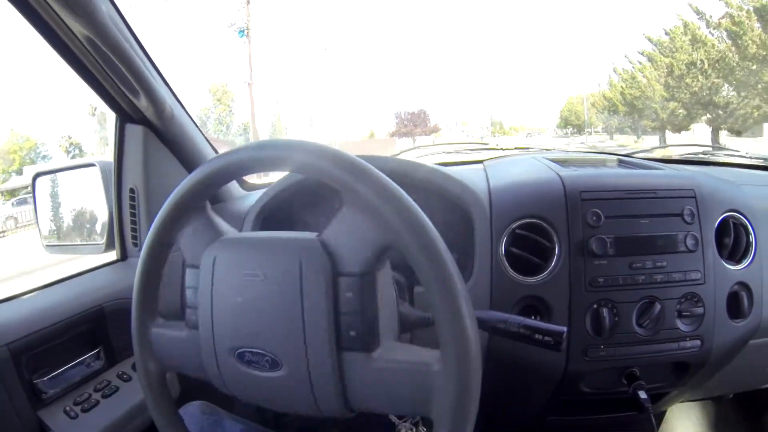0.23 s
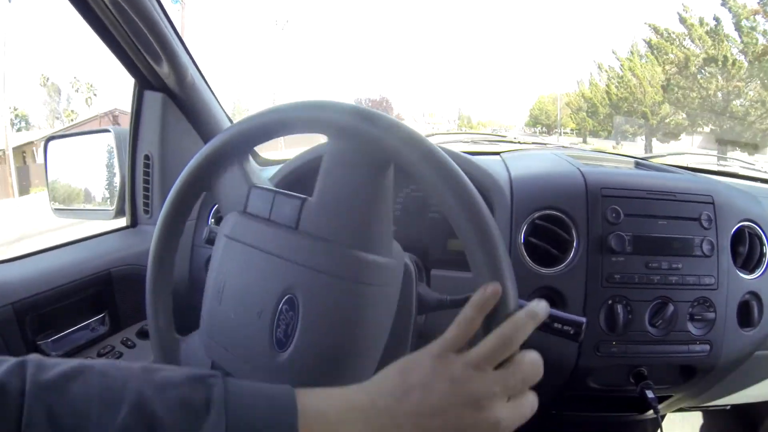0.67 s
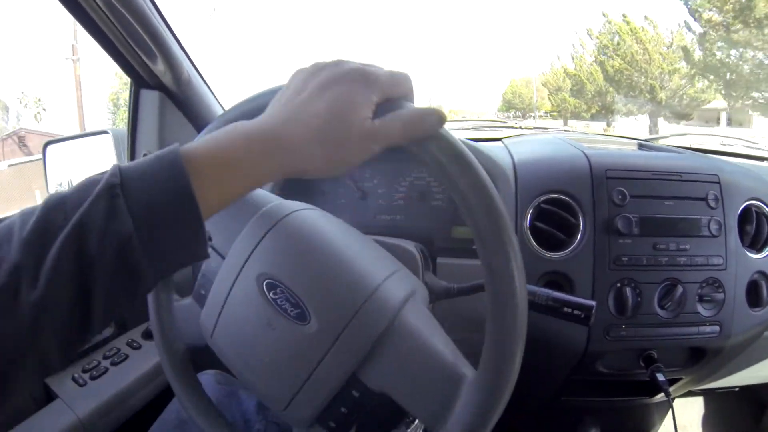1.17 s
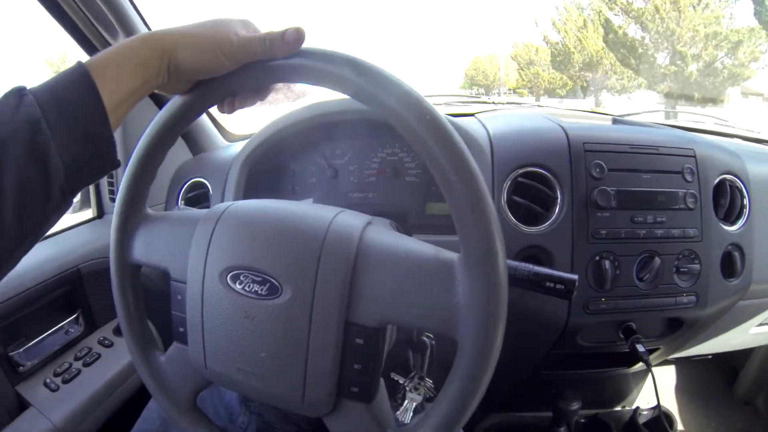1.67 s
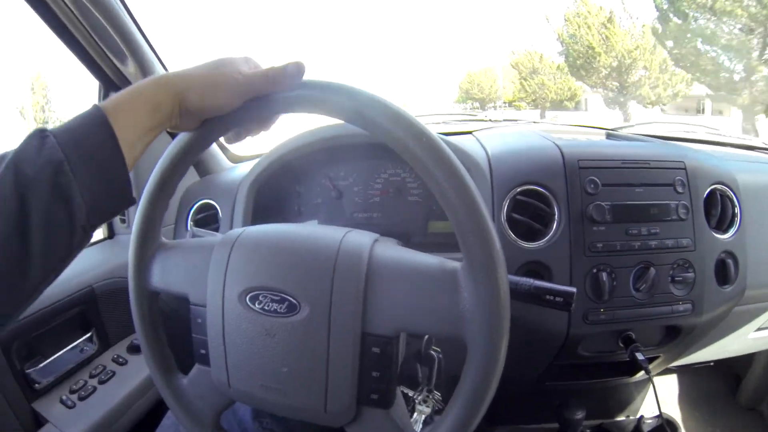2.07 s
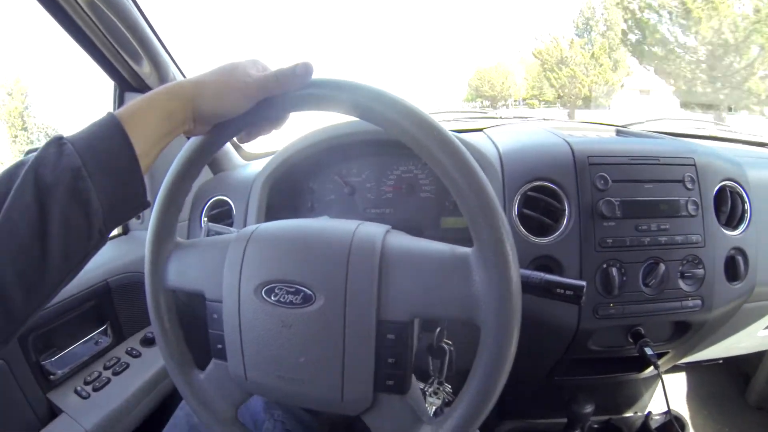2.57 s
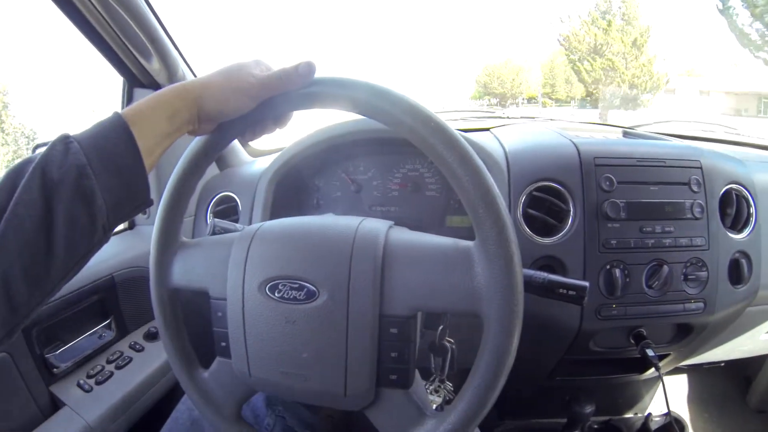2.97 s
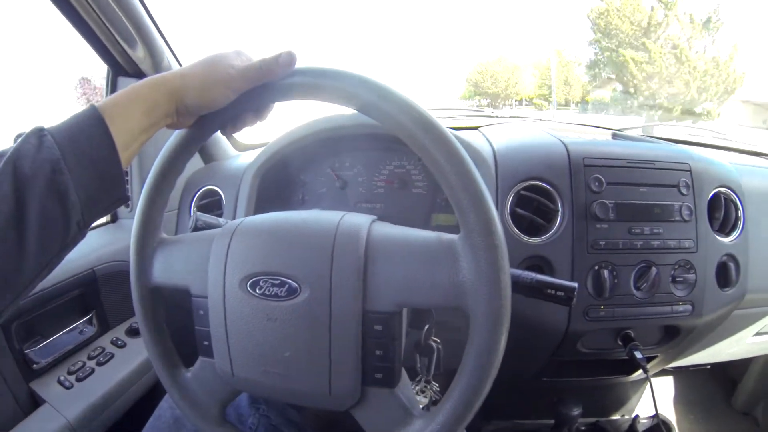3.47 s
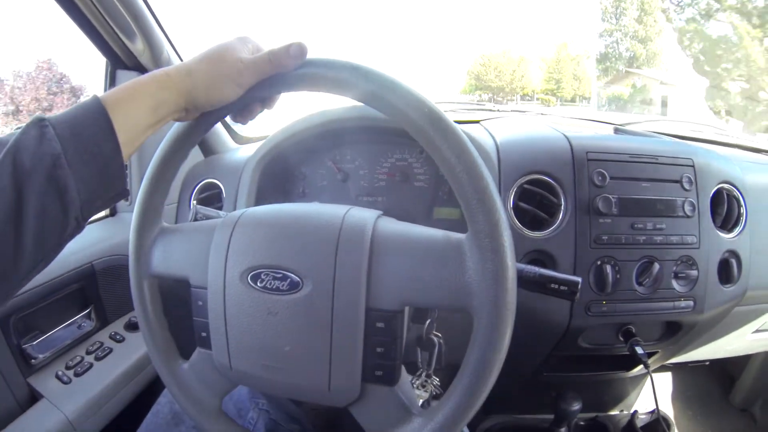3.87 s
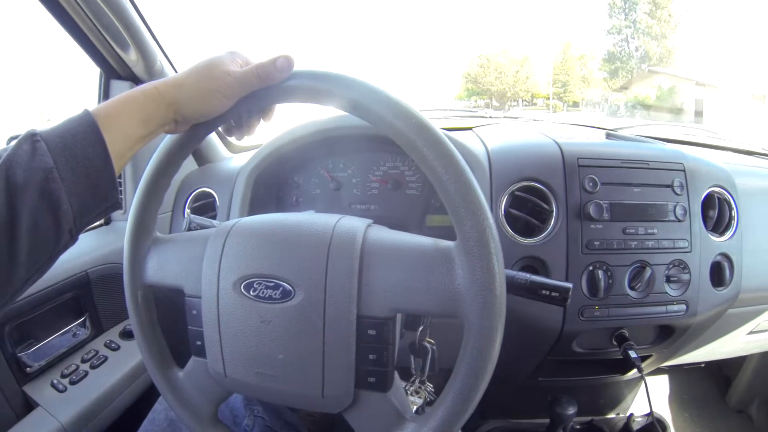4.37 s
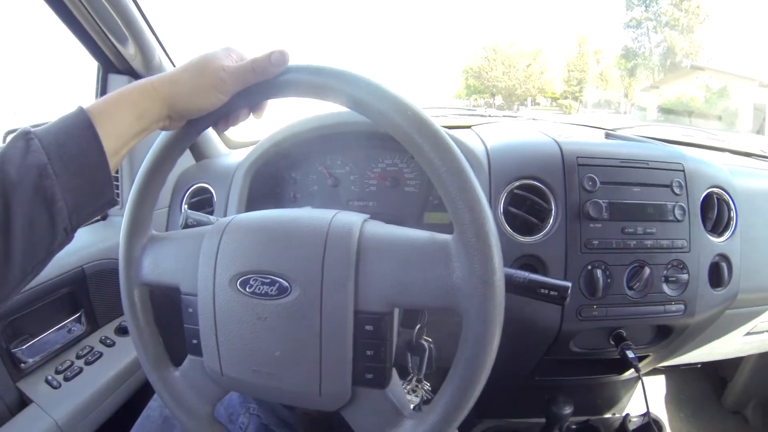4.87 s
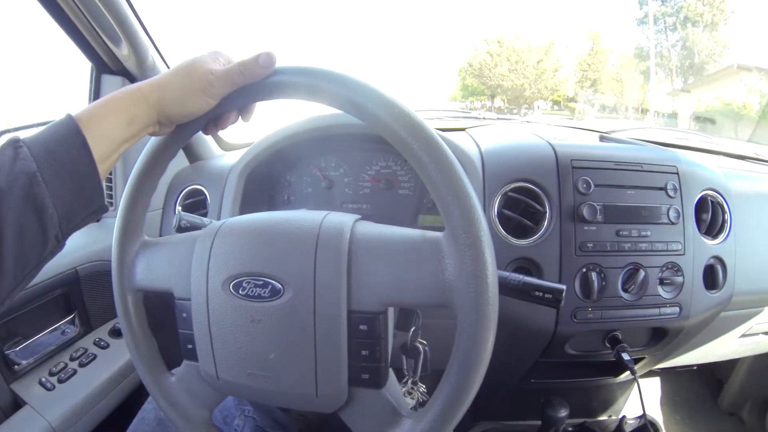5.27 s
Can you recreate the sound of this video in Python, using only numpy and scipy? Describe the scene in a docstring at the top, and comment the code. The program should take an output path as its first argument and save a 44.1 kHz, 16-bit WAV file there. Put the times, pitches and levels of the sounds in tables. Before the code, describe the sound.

Deep tyre rumble and engine hum fill a moving pickup's cab, as a hand slides on the wheel and keys clink faintly.

```python
"""An eight-cylinder engine drones, heard inside a pickup cab: it revs, shifts up and pulls again.
A worn bearing hums with road speed, the cab shakes on its mounts, its panels boom and the tyres roar.
A hand slides and slaps on the steering wheel, keys clink, thin whines come and go and loose trim ticks.
Engine, bearing, keys and whines are made of sine waves; the rest is shaped noise."""
import sys
import numpy as np
from scipy import signal
from scipy.fft import rfft, irfft, next_fast_len
from scipy.io import wavfile
from scipy.ndimage import uniform_filter1d, map_coordinates

SR = 44100
rng = np.random.default_rng(int(sys.argv[2]) if len(sys.argv) > 2 else 0)


def generate_wav(sig):
    """Save sig (samples, or channels by samples) to the path in sys.argv[1] as 16-bit PCM at SR."""
    pcm = np.round(np.clip(np.atleast_2d(sig).T, -1, 1) * 32767).astype(np.int16)
    wavfile.write(sys.argv[1], SR, pcm)


N = 243882

# The engine's main note (time [s], firing rate [Hz], level [dB])
FIRING = [(0, 138.6, -43), (.26, 146.1, -40.5), (.4, 149.6, -28), (.68, 153.5, -30.5), (.85, 155, -37),
          (1, 157.1, -42), (1.1, 158.8, -31.5), (1.25, 163.9, -42.5), (1.5, 169.5, -33.5),
          (1.7, 169.9, -30), (1.9, 170.7, -34.5), (2.3, 142.3, -43), (2.47, 148.7, -38),
          (2.57, 151.4, -31.5), (3.1, 154.5, -30), (3.45, 153.4, -35.5), (3.8, 153.9, -32),
          (4.05, 156.2, -45.5), (4.45, 160.8, -35), (4.9, 162.3, -42.5), (5.2, 164.3, -33),
          (5.53, 165, -39.5)]
# Its other tones (time [s], octave level [dB], uneven firing level [dB])
OVERTONE_LEVELS = [(0, -52, -77), (.45, -40, -42.5), (.8, -50, -55), (1.05, -45, -51), (1.3, -54, -53),
                   (1.55, -44.5, -50), (1.9, -46, -63), (2.4, -57, -42), (2.65, -37.5, -47.5),
                   (3.1, -38.5, -44.5), (3.5, -38.5, -49), (4.05, -48, -44.5), (4.35, -40, -46),
                   (4.9, -44.5, -50.5), (5.53, -52, -48)]
# Tones of uneven firing (multiple of the cycle rate, relative level [dB])
UNEVEN_TONES = [(3, 7.5), (6, -3.5), (9, 3.5), (11, 0.5), (12, -3.5), (14, -2)]
# Tones that stand out in the higher gear (multiple of the cycle rate, relative level [dB])
HIGH_GEAR_TONES = [(18, -14), (21, -1.5), (26, -6), (27, -8.5), (30, -10.5)]
def engine(shift_s=2.37):
    """Eight cylinders fire, a little unevenly, in each cycle. Returns the sound and the cycle count."""
    firing_hz, firing_db = curves(FIRING)
    octave_db, uneven_db = curves(OVERTONE_LEVELS)
    cycles = np.cumsum(firing_hz) / SR / 8
    high_gear = np.clip((np.arange(N) / SR - shift_s) / 0.35, .4, 1)
    uneven = sum(amp(db) * tone(k * cycles, waver=0.33, flutter_db=2.5) for k, db in UNEVEN_TONES)
    upper = sum(amp(db) * tone(k * cycles, waver=0.23, flutter_db=2.0) for k, db in HIGH_GEAR_TONES)
    note = amp(firing_db) * tone(8 * cycles, waver=0.02, flutter_db=1.7)
    octave = amp(octave_db) * tone(16 * cycles, waver=0.073, flutter_db=-0.54)
    return note + octave + amp(uneven_db) * (uneven + high_gear * upper), cycles


# The bearing's hum (time [s], beat rate [Hz], level [dB], level at three times that rate [dB])
BEARING_HUM = [(0, 23.7, -60, -39), (.6, 24.3, -35, -38), (1, 24.5, -26, -37), (1.5, 26.85, -52, -34.5),
               (2, 25.5, -44, -47.5), (2.45, 32.41, -30, -34.5), (2.8, 31.06, -38, -32.5),
               (3.28, 36.56, -23.5, -42.5), (3.55, 37.34, -31, -47), (3.9, 38.33, -26, -41),
               (4.2, 39.13, -18.5, -30.5), (4.5, 42.07, -35.5, -36.5), (4.8, 41.88, -33, -41.5),
               (5.1, 40.75, -27.5, -40), (5.53, 39.65, -34, -34)]
def bearing():
    """A worn bearing hums at 1, 3 and 6 times its beat, rising with road speed whatever the gear."""
    beat_hz, beat_db, third_db = curves(BEARING_HUM)
    turns = np.cumsum(beat_hz) / SR
    sixth_db = third_db - 21 + 0.84 * (beat_hz - beat_hz[0])  # gains with speed
    return (amp(beat_db) * tone(turns, waver=0.22, flutter_db=3.1)
            + amp(third_db) * tone(3 * turns, waver=0.18, flutter_db=1.3)
            + amp(sixth_db) * tone(6 * turns, waver=0.88, flutter_db=2.5))


# How the cab's mounts resonate (frequency [Hz], relative level [dB])
MOUNT_COLOUR = [(7, -19), (13.5, -9), (19, 1), (25, -7), (32, -22.5)]
# Bumps in the road (time [s], level [dB])
BUMPS = [(.08, -15.5), (1.52, -20), (1.95, -18), (2.22, -21), (2.55, -22), (3.03, -19.5), (3.55, -23),
         (3.76, -17.5), (3.98, -16), (4.36, -19), (4.92, -17), (5.3, -21.5), (5.5, -20)]
def cab_shake(steady_db=-24.5, rise_s=0.15, fall_s=0.086):
    """The cab bounces on its mounts all the time, and harder at each bump."""
    margin = SR // 4
    padded = np.pad(rush(MOUNT_COLOUR, patchy_db=-2.5), margin, "reflect")
    swing = signal.hilbert(padded, next_fast_len(N + SR))[margin:][:N]
    # Keep the low shake at an even strength, so each bump stands out
    bounce = unit(swing.real / (np.abs(swing) + .2))
    jolts = swells([(s, rise_s, fall_s, db) for s, db in BUMPS])
    return np.hypot(amp(steady_db), jolts) * bounce


# The panels' deep sound (frequency [Hz], relative level [dB])
PANEL_COLOUR = [(14, -25), (24, -3), (47, 3.5), (57, -11), (70, -21.5), (80, -29.5), (100, -52)]
# How loudly they boom (time [s], level [dB])
PANEL_LEVEL = [(0, -21.5), (.4, -30), (.9, -34.5), (1.5, -28), (1.9, -24.5), (2.4, -26), (2.8, -28),
               (3.3, -27.5), (3.8, -30.5), (5.2, -27), (5.53, -35)]
def panel_boom():
    """The cab's panels vibrate with a low, wavering boom."""
    return amp(curves(PANEL_LEVEL)[0] + 3.32 * wobble(6.015)) * rush(PANEL_COLOUR, patchy_db=-1.0)


# The tyres' low roar and high hiss (frequency [Hz], relative level [dB])
ROAR_COLOUR = [(55, -17.5), (75, 3.5), (112, 5.5), (136, 2.5), (165, 4.5), (195, -10.5), (235, -4),
               (300, -4.5), (400, -8), (550, -17), (650, -19), (1250, -26), (1700, -34), (2500, -47.5)]
HISS_COLOUR = [(1000, -1), (1700, -2.5), (2100, 0), (3050, -8), (3430, -8.5), (4000, -13), (6000, -20),
               (9000, -27), (12600, -29.5), (14200, -44.5), (15000, -57.5)]
# How loudly they roar (time [s], level [dB])
TYRE_LEVEL = [(0, -33), (1.5, -31), (2.3, -32), (2.9, -31.5), (3.9, -30.5), (4.45, -28.5), (5.53, -29.5)]
def tyres(cycles, thud_hz=130, hiss_db=-55.5):
    """Rolling tyres roar and hiss, throbbing with the engine; the lowest part thuds unevenly."""
    throb_db = .45 * np.sin(2 * np.pi * cycles) + .45 * np.sin(4 * np.pi * cycles)
    roar = amp(curves(TYRE_LEVEL)[0] + 0.27 * wobble(8) + throb_db) * rush(ROAR_COLOUR, patchy_db=0.62)
    lows = filtered(roar, lambda hz: 1 / (1 + (hz / thud_hz) ** 4))
    thuds = (amp(2.5 * wobble(5.08)) - 1) * lows
    hiss = amp(hiss_db + 0.11 * wobble(12) + 0.6 * throb_db) * rush(HISS_COLOUR, patchy_db=0.56)
    return roar + thuds + hiss


# Bright swishes and ticks; duller rasps and knocks (frequency [Hz], relative level [dB])
BRIGHT_COLOUR = [(3000, -20), (5000, -2), (10300, -2.5), (13000, -6), (15000, -12.5)]
DULL_COLOUR = [(500, -16), (1000, 0), (2300, -1.5), (4300, -11), (5500, -13), (14500, -32.5)]
# The wheel slides; the grip tightens (peak time [s], rise [s], fall [s], level [dB])
PALM_SLIDES = [(.07, 0.099, 0.33, -66.5), (.46, 0.11, 0.1, -59.5), (.78, 0.35, .3, -70),
               (1.25, 0.23, 0.24, -69), (1.53, 0.04, .15, -67)]
TIGHT_GRIPS = [(.65, 0.12, 0.13, -57), (1.15, 0.21, 0.23, -56), (1.36, 0.21, 0.14, -53.5),
               (1.53, 0.055, 0.18, -49.5), (1.8, .1, 0.2, -59)]
def hand_rub(slips_per_s=82, slip_t60_s=.03):
    """The wheel swishes through a loose palm; in a tight grip, skin sticks and lets go with a rasp."""
    swish = unit(amp(1.2 * wobble(40)) * rush(BRIGHT_COLOUR, patchy_db=.5))
    slips = np.cumsum(slips_per_s * amp(2.5 * wobble(45))) / SR
    size_db = 1.8 * rng.standard_normal(1000)[slips.astype(int)]
    since_slip_s = (slips % 1) / slips_per_s
    catches = amp(size_db) * decay(since_slip_s, slip_t60_s) + amp(-10)  # plus a steady rub
    rasp = unit(wheel_rim(catches * rush(DULL_COLOUR, patchy_db=2.0)))
    return swells(PALM_SLIDES) * swish + swells(TIGHT_GRIPS) * rasp


# Slaps and ticks on the wheel (time [s], level [dB], knock boost [dB])
WHEEL_TAPS = [(0.0414, -41, -10), (0.4645, -48.5, 9.5), (0.588, -56, 2), (0.618, -58, 9), (0.653, -59.5, 6),
              (0.7944, -56.5, 7.5), (1.0822, -62, 14), (1.284, -57, 8), (1.503, -60, 13), (1.534, -61, 16),
              (1.584, -52, 17), (1.5909, -60, 19), (1.6168, -61, 17), (1.6373, -60, 18),
              (1.6641, -57.5, 12), (1.6995, -53, 11.5), (1.7414, -51.5, 11), (2.0453, -60, 2),
              (3.3911, -60.5, -3), (3.976, -61, 10), (4.2561, -63, 8), (4.5904, -61, 6)]
def hand_taps(landing_s=0.00095):
    """Each tap is a short burst of noise, bright on top with a duller knock below."""
    bright, knock = np.zeros((2, N + SR))
    t = np.arange(SR // 8) / SR
    rise = 1 - np.exp(-t / landing_s)  # a soft palm lands over a few ms
    crack = amp(2) * decay(t, 0.012)  # the first contact
    for s, db, boost_db in WHEEL_TAPS:
        start = round(s * SR)
        bright[start:][:len(t)] += amp(db) * decay(t, 0.044) * rise
        knock[start:][:len(t)] += amp(db + boost_db) * (decay(t, 0.065) + crack) * rise
    ticks = bright[:N] * rush(BRIGHT_COLOUR, patchy_db=1.5)
    return ticks + wheel_rim(knock[:N] * rush(DULL_COLOUR, patchy_db=1.5)) / 2


# Where the wheel's rim rings (pitch [Hz], width [Hz], strength [dB])
RIM_RINGS = [(1925, 110, 2.5), (2395, 230, 2), (3430, 150, 4.5), (3830, 220, 2.5), (4300, 180, 3.5)]
def wheel_rim(x):
    """The plastic wheel rings along with x, lifting a few pitches."""
    return filtered(x, lambda hz: 1 + sum(
        amp(db) * 1j * hz * width / (pitch ** 2 - hz ** 2 + 1j * hz * width)
        for pitch, width, db in RIM_RINGS))


# Keys hit each other (time [s], level [dB])
KEY_HITS = [(.793, -58), (.808, -62), (.822, -61), (1.285, -57), (1.587, -51)]
# A key's tones (pitch [Hz], relative level [dB], time to fall 60 dB [s])
KEY_TONES = [(5500, -2, 0.06), (6030, 4, 0.055), (6250, 0, 0.045), (4100, -2, 0.025)]
# The key ring's small parts touch (time [s], level [dB], centre pitch [Hz])
SMALL_CLINKS = [(2.0458, -64, 13100), (3.5395, -64, 14000), (3.691, -55, 13360), (3.9754, -60, 11900),
                (4.2556, -64, 13540), (4.5535, -62, 7170), (4.59, -62, 6990)]
def keys(pitch_spread=.06, landing_s=0.00095):
    """Swinging keys and small metal parts collide and ring briefly, with slightly rough tones."""
    out, t = np.zeros(N + SR), np.arange(SR // 8) / SR
    for s, db in KEY_HITS:
        for hz, tone_db, t60_s in KEY_TONES:
            gain = amp(db + tone_db + rng.normal(0, 3.1)) * decay(t, t60_s)
            drift = np.cumsum(rng.normal(0, 0.082, len(t)))
            out[round(s * SR):][:len(t)] += gain * np.sin(2 * np.pi * hz * t + drift)
    rise = 1 - np.exp(-t / landing_s)
    for s, db, hz in SMALL_CLINKS:
        tones_hz = hz * (1 + pitch_spread * rng.uniform(-1.3, 1, size=(6, 1)))
        drift = np.cumsum(rng.normal(0, .15, (6, len(t))), axis=1)
        ring = 2 * np.sin(2 * np.pi * tones_hz * t + drift).mean(axis=0)
        out[round(s * SR):][:len(t)] += amp(db) * decay(t, 0.054) * rise * ring
    return out[:N]


# Brief thin whines (start [s], end [s], first pitch [Hz], last pitch [Hz], level [dB])
WHINE_GLIDES = [(0.763, 1.104, 233.7, 239, -39), (0.859, 1.18, 1045, 1112, -56.5),
                (0.895, 1.1, 790, 815, -54), (0.648, 1.457, 459.3, 503, -51.5),
                (1.21, 1.899, 297, 313, -43), (1.52, 1.85, 1020, 1030, -57),
                (2.308, 3.105, 3380, 3400, -73), (3.8, 4.17, 3312, 3430, -72),
                (4.55, 5.25, 1127, 1151, -62), (4.65, 5.298, 2920, 3020, -71),
                (4.048, 4.8, 1940, 1956, -67)]
def whines():
    """Each whine glides up, swelling and fading once; higher ones flutter more and sound scratchier."""
    t, out = np.arange(N) / SR, 0
    for start, end, first_hz, last_hz, db in WHINE_GLIDES:
        progress = np.clip((t - start) / (end - start), 0, 1)
        khz = first_hz / 1000
        scratch = .11 * khz * wobble(80)
        turns = np.cumsum(first_hz + (last_hz - first_hz) * progress) / SR + scratch
        flutter = amp(1.3 * khz * wobble(30))
        swell = np.sqrt(np.abs(np.sin(np.pi * progress)))
        out += amp(db) * swell * flutter * tone(turns, waver=1.2, flutter_db=1.2)
    return out


def trim(ticks_per_s=7):
    """Loose trim gives faint, bright ticks at random moments."""
    when, softness = rng.random((round(ticks_per_s * N / SR), 2)).T
    blows = np.bincount((when * N).astype(int), amp(-78) / np.sqrt(softness + .15), N)
    dying = decay(np.arange(SR // 20) / SR, .03)
    return signal.fftconvolve(blows, dying)[:N] * rush(BRIGHT_COLOUR, patchy_db=3)


def amp(db):
    """Turn a level in dB into a gain."""
    return 10 ** (np.asarray(db) / 20)


def decay(t, t60_s):
    """A gain that falls 60 dB every t60_s seconds."""
    return amp(-60 * t / t60_s)


def unit(x):
    """Scale x to an average power of 1."""
    return x / np.sqrt(np.mean(x ** 2) + 1e-20)


def curves(rows):
    """One value per sample for each column after the time."""
    times, *columns = np.transpose(rows)
    return [np.interp(np.arange(N) / SR, times, column) for column in columns]


def swells(rows):
    """A gain that rises and falls around each row's peak time; overlapping powers add."""
    t = np.arange(0, N, 64) / SR
    power = sum(amp(db) ** 2 * np.exp(-2 * np.where(t < s, (s - t) / rise, (t - s) / fall) ** 2)
                for s, rise, fall, db in rows)
    return np.interp(np.arange(N) / SR, t, np.sqrt(power))


def wobble(rate):
    """A smooth curve through `rate` random points a second."""
    steps = np.arange(0, N + 64, 64)
    points = rng.standard_normal(int(N * rate / SR) + 4)
    return np.interp(np.arange(N), steps, map_coordinates(points, [steps * rate / SR + 1]))


def filtered(x, response):
    """Scale each frequency in x by response(hz)."""
    size = next_fast_len(N + 8192)
    return irfft(rfft(x, size) * response(np.fft.rfftfreq(size, 1 / SR)), size)[..., :N]


def rush(colour, patchy_db):
    """Noise of power 1, shaped by a colour table, with random louder and softer patches."""
    grid = signal.stft(rng.standard_normal(N), nperseg=512)[2]
    patches = uniform_filter1d(rng.standard_normal(grid.shape), size=6, axis=0, mode="wrap")
    patches = uniform_filter1d(patches, size=10, axis=1, mode="wrap")
    noise = signal.istft(grid * amp(patchy_db * unit(patches)), nperseg=512)[1][:N]
    points_hz, db = np.transpose(colour)
    return unit(filtered(noise, lambda hz: amp(np.interp(np.log(hz + 1), np.log(points_hz), db, -120, -120))))


def tone(turns, waver, flutter_db):
    """A sine wave on a running count of turns, unsteady in phase (waver, radians) and level."""
    phase = 2 * np.pi * (turns + rng.random()) + waver * wobble(7)
    return np.sqrt(2) * np.sin(phase) * amp(flutter_db * wobble(6))


def scene():
    """Add all the sounds into one channel."""
    motor, cycles = engine()
    tones = motor + whines() + bearing()
    road = cab_shake() + panel_boom() + tyres(cycles)
    return (tones + road + hand_rub() + hand_taps() + keys() + trim())[None]


def record(dry, fade_s=.006, top_hz=15100):
    """Fade the very end and cut the highest treble."""
    fade = np.sin(np.pi / 2 * np.clip(np.arange(N)[::-1] / SR / fade_s, 0, 1)) ** 2
    return filtered(dry * fade, lambda hz: hz < top_hz)


dry = scene()
out = record(dry)
generate_wav(out)
```